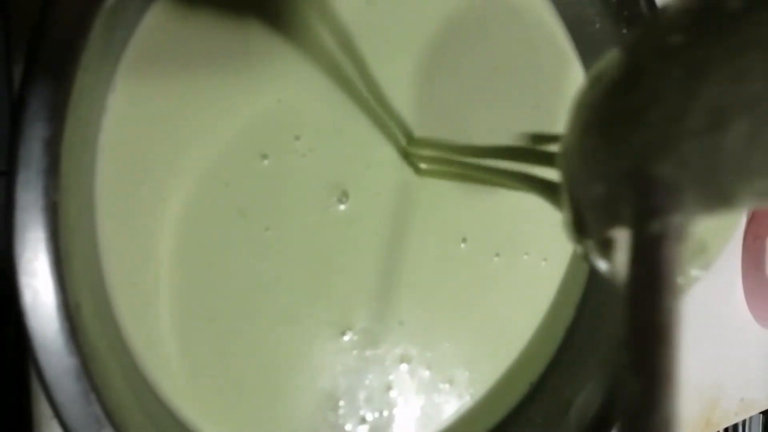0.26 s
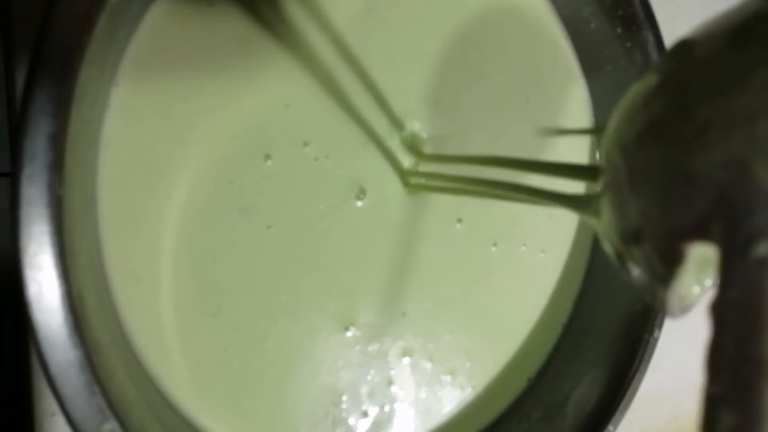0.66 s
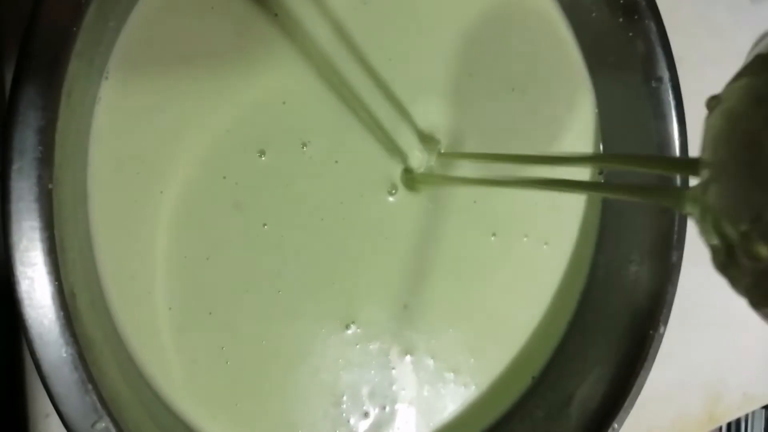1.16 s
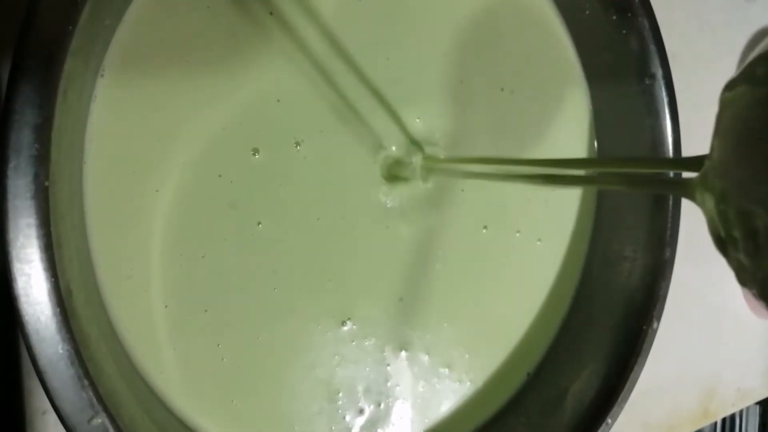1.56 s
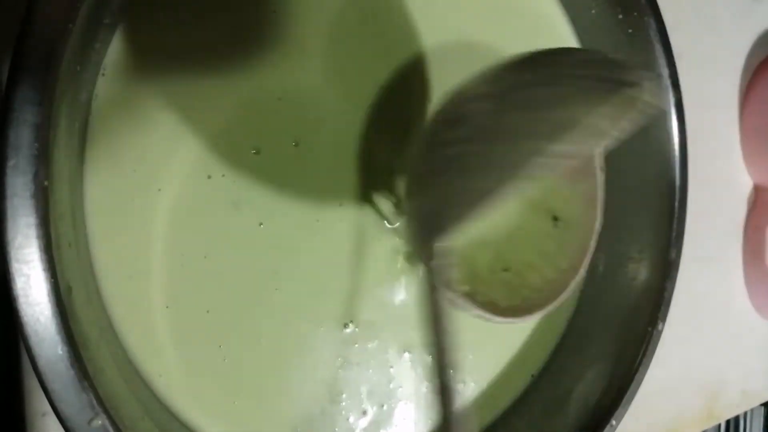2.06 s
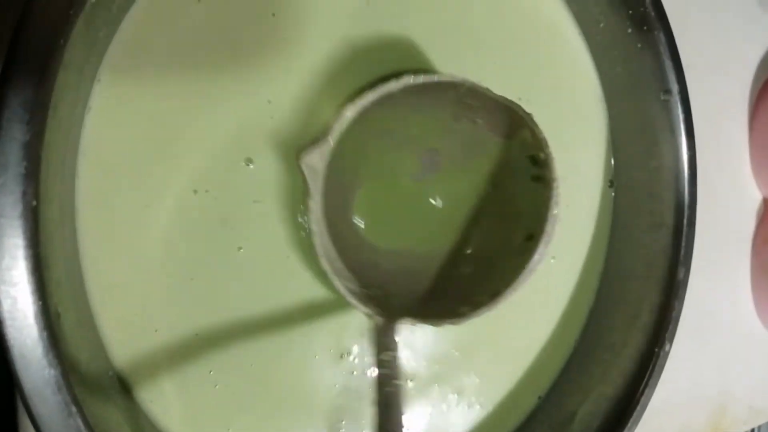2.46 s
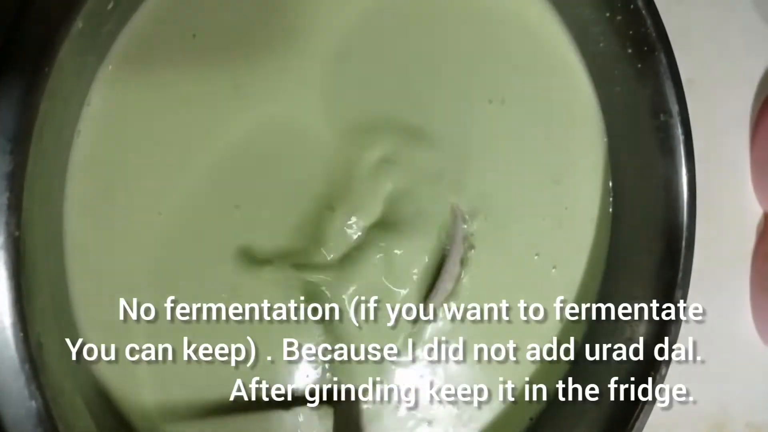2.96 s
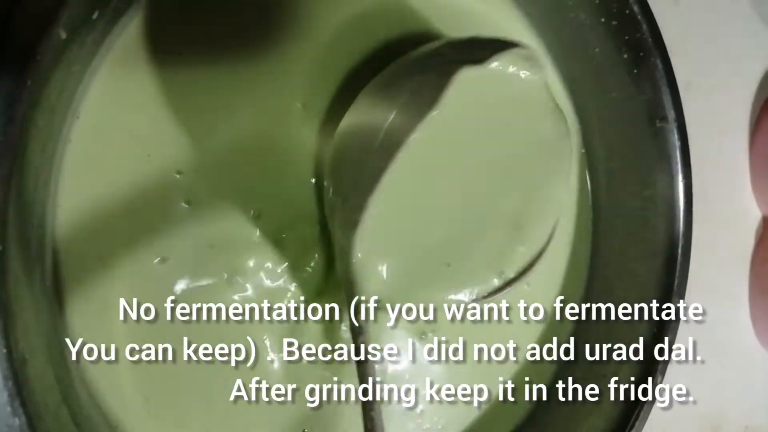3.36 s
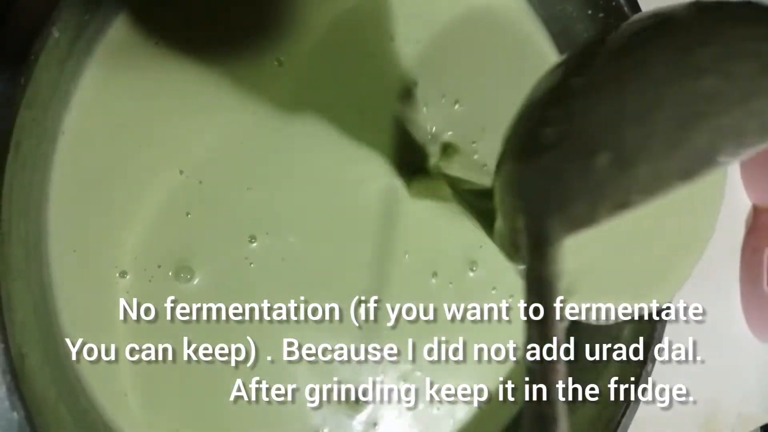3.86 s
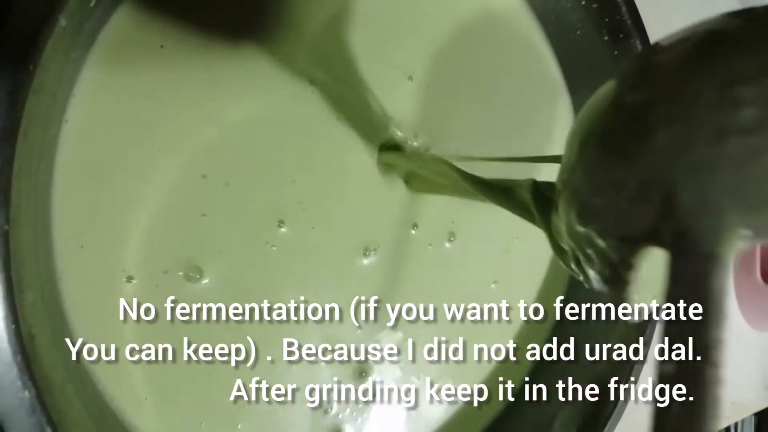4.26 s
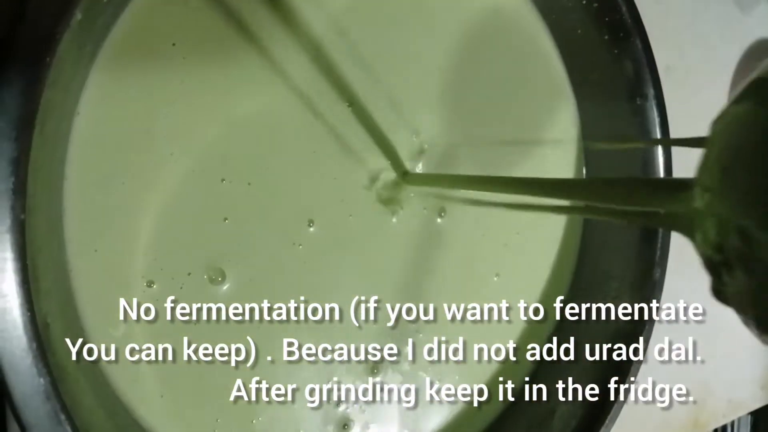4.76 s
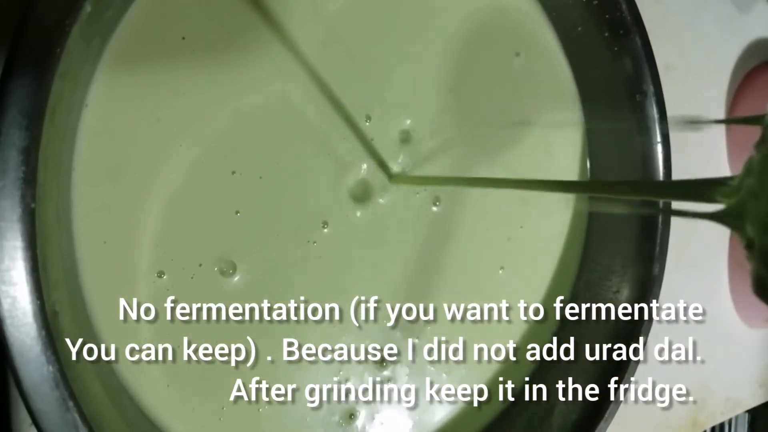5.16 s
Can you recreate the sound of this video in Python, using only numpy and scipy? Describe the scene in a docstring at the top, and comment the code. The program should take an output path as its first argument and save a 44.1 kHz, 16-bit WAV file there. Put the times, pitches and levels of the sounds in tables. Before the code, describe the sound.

Wet plopping and crackling drops of batter fall in two flurries, split by a quiet gap and soft low thuds, in a small kitchen.

```python
"""Batter dripping into a steel vessel

Thick batter drips and runs from a lifted ladle into a steel vessel in a small hard-walled kitchen.
Trapped air pockets plop and glide as decaying sines; small high bubbles snap; noise bursts spatter.
Random bubbles fizz, a shaking tone gurgles, low modes thud; appliance tones and room tone lie behind.
The left microphone port is covered: it hears dull bass, its own hiss and the touch of a hand."""
import sys
import numpy as np
from scipy import signal
from scipy.fft import rfft, irfft
from scipy.io import wavfile

SR = 44100
rng = np.random.default_rng(int(sys.argv[2]) if len(sys.argv) > 2 else 0)


def to_wav(s):
    """Save 16-bit WAV."""
    ch = np.atleast_2d(s).T  # columns
    pcm = np.round(np.clip(ch, -1, 1) * 32767)  # PCM
    wavfile.write(sys.argv[1], SR, pcm.astype(np.int16))


N = 238272


def amp(db):
    """Decibels to gain."""
    return 10 ** (np.asarray(db) / 20)


def rms_one(x):
    """Scales to unit rms."""
    return x / np.sqrt(np.mean(x ** 2) + 1e-20)


def in_time(rows, column=1, outside=None):
    """One column of a breakpoint curve, interpolated at every sample."""
    rows = np.array(rows)
    return np.interp(np.arange(N) / SR, rows[:, 0], rows[:, column], left=outside, right=outside)


def colour(x, spectrum):
    """Filters by (hz, db) points, interpolated over log frequency."""
    hz, db = np.transpose(spectrum)
    bin_hz = np.maximum(np.fft.rfftfreq(len(x), 1 / SR), 1)
    gain = amp(np.interp(np.log(bin_hz), np.log(hz), db))
    return irfft(rfft(x) * gain, len(x))


def drift(hz):
    """Two-pole low-passed noise of unit rms: slow chance."""
    r = np.exp(-2 * np.pi * hz / SR)
    noise = rng.standard_normal(N + SR)
    settled = signal.lfilter([1], [1, -2 * r, r * r], noise)[SR:]
    return rms_one(settled)


def add(out, start_s, sound):
    """Mixes a sound in from start_s."""
    i = round(start_s * SR)
    out[i:i + len(sound)] += sound[:N - i]


def bubble(hz, cycles, rise_oct):
    """Sine that swells fast, falls 15.5 dB per life (at least 2 cycles) and climbs rise_oct per life."""
    life_s = max(cycles, 2) / hz
    t = np.arange(int(2 * life_s * SR)) / SR
    envelope = (1 - np.exp(-t * hz / 3.1)) * amp(-60 * t / (3.87 * life_s))
    turns = np.cumsum(hz * 2 ** (rise_oct * t / life_s)) / SR
    return np.sin(2 * np.pi * turns) * envelope / envelope.max()


# air pockets shut in by the falling batter: start_s, level_db (relative), pitch_hz, life_cycles
PLOPS = [(0.1244, -53.5, 3300, 6.8), (0.3895, -30, 3080, 3.8), (0.5287, -46.5, 2630, 3.3),
         (0.529, -35, 1414, 12.6), (0.568, -41, 1360, 8.4), (0.5796, -40, 1890, 4.1),
         (0.655, -40.5, 1560, 3.5), (0.8062, -45, 2280, 11), (0.823, -40, 1586, 8.5),
         (0.839, -40, 2520, 8.8), (0.873, -48, 3270, 26), (0.928, -45, 1585, 7.1), (0.9343, -28, 2900, 2.7),
         (1.004, -38.5, 1480, 8.8), (1.006, -36.5, 2570, 1.6), (1.0365, -30.5, 1650, 2.1),
         (1.057, -44.5, 2580, 7.6), (1.1406, -26.5, 2463, 11.5), (1.1758, -29.5, 2565, 11),
         (1.263, -30.5, 905, 8.6), (1.2918, -32, 2870, 4.8), (1.323, -34.5, 1230, 2.6),
         (1.33, -26, 3300, 9.4), (1.346, -35.5, 1560, 5.3), (1.38, -37.5, 2630, 9.7),
         (1.404, -34, 910, 3.8), (1.4077, -36, 1740, 2.7), (1.484, -47, 1910, 9.9),
         (1.539, -38.5, 2980, 11), (1.55, -29.5, 2340, 3.5), (1.6887, -43.5, 2080, 5.4),
         (1.7398, -27.5, 4050, 7.1), (1.7799, -31.5, 2430, 3.4), (1.792, -35, 1535, 8.8),
         (1.855, -40, 928, 20), (1.882, -31.5, 848, 5.9), (1.92, -31.5, 3090, 7.2),
         (1.9652, -32, 2385, 5.2), (1.966, -40, 1545, 13), (2.758, -48, 3420, 18), (2.7666, -45, 3320, 26),
         (2.847, -34.5, 1030, 13.6), (2.8469, -41, 2320, 5.4), (2.8656, -25, 3350, 4.9),
         (3.48, -50, 2760, 12), (3.5749, -42, 2860, 9.7), (3.6074, -37, 2750, 2.1),
         (3.6735, -48, 2930, 7.8), (3.8332, -50.5, 3180, 7.7), (3.8486, -39, 1890, 4.4),
         (3.93, -41, 2340, 4), (4.0206, -48.5, 2270, 5.9), (4.1393, -49, 2460, 7.1),
         (4.1842, -49, 2410, 22), (4.225, -33.5, 2270, 2.6), (4.255, -44, 1137, 6.9),
         (4.2933, -26.5, 2100, 2.4), (4.3243, -42.5, 3090, 21), (4.3587, -27, 2700, 1.9),
         (4.427, -38, 1640, 5.7), (4.4302, -35.5, 1980, 5.5), (4.4762, -40.5, 2640, 12),
         (4.492, -35, 1504, 10), (4.516, -42, 1400, 14), (4.5173, -23, 2800, 3.8),
         (4.5945, -48.5, 1950, 11), (4.6476, -39, 2680, 10), (4.659, -35, 3180, 6.3),
         (4.728, -46, 1110, 1.7), (4.7267, -54, 2500, 10), (4.763, -35.5, 2380, 3.3),
         (4.812, -28, 1830, 5.6), (5.035, -41, 1553, 12.7), (5.0898, -55.5, 2080, 9),
         (5.1123, -45, 3230, 4.6), (5.353, -54.5, 880, 20)]
BEND_OCT = .04  # most rise per life


def plops():
    """A ringing air pocket each, bent up by chance, with the brief higher slap of the drop."""
    out = np.zeros(N)
    for start_s, level_db, pitch_hz, cycles in PLOPS:
        add(out, start_s, amp(level_db) * bubble(pitch_hz, cycles, BEND_OCT * rng.random()))
        slap = bubble(1.45 * pitch_hz, cycles=2.2, rise_oct=.03)
        add(out, start_s, amp(level_db - 6.0) * slap)
    return out


# pockets that open as they reach the surface:
# start_s, level_db (relative), start_hz, life_cycles, rise_oct (per life)
GLIDES = [(1.321, -33.5, 2200, 20.7, 0.88), (1.542, -39.5, 1592, 18, 0.66), (1.712, -39.5, 1780, 31, 1)]


def glides():
    """One bubble of rising pitch each."""
    out = np.zeros(N)
    for start_s, level_db, start_hz, cycles, rise_oct in GLIDES:
        add(out, start_s, amp(level_db) * bubble(start_hz, cycles, rise_oct))
    return out


# tiny bubbles bursting at the surface: start_s, level_db (relative), pitch_hz
SNAPS = [(0.386, -35, 5500), (0.4114, -36.5, 4990), (0.5662, -51, 5340), (0.6958, -31, 5200),
         (0.884, -49, 5370), (0.902, -27, 4870), (0.927, -34.5, 5760), (1.0346, -40, 5400),
         (1.3384, -28, 6300), (1.3657, -25.5, 5550), (1.4094, -28.5, 6340), (1.524, -20, 5880),
         (1.5838, -22.5, 6740), (1.6978, -40.5, 5500), (1.7285, -28, 5140), (1.8804, -33.5, 5500),
         (1.9158, -33, 5520), (2.2425, -51.5, 5840), (2.3102, -49, 5180), (2.8664, -32.5, 5340),
         (3.4798, -45, 5600), (3.6079, -32, 6050), (3.835, -41.5, 6900), (3.848, -24, 5380),
         (3.9535, -41, 5440), (4.0208, -44.5, 5640), (4.0868, -47, 5800), (4.2919, -41, 5700),
         (4.3235, -37.5, 5600), (4.338, -33, 5160), (4.4273, -39, 5240), (4.492, -38.5, 5540),
         (4.5047, -24, 5440), (4.5965, -32.5, 4850), (4.664, -32, 5860), (4.81, -38, 5550),
         (4.8489, -20.5, 5500), (4.9575, -40, 5600), (5.3903, -46.5, 5470)]
# film burst by every drop: level relative to its plop, centre pitch, rms spread
FILM_DB, FILM_HZ, FILM_SPREAD_OCT = -11, 5550, .04


def snaps():
    """A small high bubble each, plus a film bubble fainter than the plop it comes with."""
    films = []
    for start_s, plop_db, *_ in PLOPS:
        film_hz = FILM_HZ * 2 ** (FILM_SPREAD_OCT * rng.standard_normal())
        films.append((start_s, plop_db + FILM_DB, film_hz))
    out = np.zeros(N)
    for start_s, level_db, pitch_hz in SNAPS + films:
        add(out, start_s, amp(level_db) * bubble(pitch_hz, cycles=4.4, rise_oct=0.0041))
    return out


# flecks thrown off where the stream breaks: start_s, level_db (relative), t60_s
SPLASHES = [(0.386, -39.5, 0.016), (0.6363, -58, 0.032), (0.927, -50.5, 0.028), (1.139, -54, 0.021),
            (1.1762, -34.5, 0.024), (1.2151, -39, 0.02), (1.381, -40, 0.026), (1.4162, -40, 0.024),
            (1.4378, -41.5, 0.14), (1.5233, -63, 0.015), (1.563, -42.5, 0.026), (1.717, -48, 0.078),
            (1.855, -49, 0.066), (1.8996, -51.5, 0.073), (1.9662, -48, 0.03), (2.7457, -57.5, 0.04),
            (2.849, -44.5, 0.046), (2.8642, -27.5, 0.021), (2.874, -44, 0.071), (3.558, -62.5, 0.042),
            (3.6071, -48, 0.017), (3.8476, -50.5, 0.028), (4.2926, -44.5, 0.034), (4.3243, -42, 0.028),
            (4.357, -47, 0.03), (4.4271, -53, 0.03), (4.504, -52, 0.055), (4.845, -48, 0.022),
            (5.3542, -39, 0.022)]
# colour of the flecks: freq_hz, gain_db
SPATTER = [(700, -14.5), (1500, -6), (3000, -15), (5500, -5), (8000, -11.5), (11000, -12), (15000, -12),
           (16200, -28)]


def splashes():
    """Short decaying bursts of broad noise, made gritty by fast level drift."""
    gate, t = np.zeros(N), np.arange(SR // 8) / SR
    for start_s, level_db, t60_s in SPLASHES:
        decay = amp(level_db - 60 * t / max(t60_s, .004))
        add(gate, start_s, decay * (1 - np.exp(-t / 0.00095)))
    grit = rng.standard_normal(N) * amp(6.0 * drift(1000.0))
    return gate * rms_one(colour(grit, SPATTER))


# the broken stream fizzing, one curve per stretch: time_s, level_db (relative)
FIZZ = [
    [(0.8, -83), (0.994, -79), (1.274, -58.5), (1.418, -65), (1.544, -71), (1.834, -58.5), (1.87, -52),
     (1.99, -72), (2.1, -103)],
    [(4.15, -93), (4.248, -63), (4.386, -65.5), (4.452, -88), (4.584, -70), (4.724, -79), (4.95, -82)],
]
DRIPS_DB = -3.5  # stray droplets against the fizz


def fizz(per_s, cycles, top_hz):
    """Faint bubbles at random moments, of random strength and one of 16 pitches."""
    level = sum(amp(in_time(curve, outside=-120)) for curve in FIZZ)
    strength = amp(3.0 * np.minimum(rng.exponential(1, N), 3))
    clicks = (rng.random(N) < per_s / SR) * strength
    pitch_index = rng.integers(0, 16, N)
    out = np.zeros(N)
    for k, hz in enumerate(np.geomspace(1100, top_hz, 16)):
        out += signal.oaconvolve(clicks * (pitch_index == k), bubble(hz, cycles, rise_oct=0.17))[:N]
    return level * rms_one(out) * amp(3.0 * drift(25.0))


# stream drumming on a hollow it keeps open in the batter, one curve per stretch:
# time_s, level_db (relative), pitch_hz (before shake)
GURGLE = [
    [(1.25, -62, 911), (1.306, -67, 887), (1.342, -52, 1000), (1.5, -65, 818)],
    [(1.64, -47.5, 723), (1.684, -68, 750), (1.734, -60, 891), (1.842, -51, 848), (2.0, -53, 925),
     (2.04, -93, 910)],
    [(4.72, -57, 1138), (4.91, -73.5, 1116), (5.12, -72, 1175)],
]


def gurgle():
    """A rough sine whose level and pitch shake by chance."""
    shake = 2 ** (.045 * drift(60.0))
    swell = amp(4.5 * drift(40.0))
    out = np.zeros(N)
    for curve in GURGLE:
        turns = np.cumsum(in_time(curve, column=2) * shake) / SR
        out += amp(in_time(curve, outside=-120)) * swell * np.sin(2 * np.pi * turns)
    return out


# exponential noise tails; energy gain relative to the direct sound
VESSEL_T60_S, VESSEL_DB, KITCHEN_T60_S, KITCHEN_DB = 0.068, 0, 0.33, -7.5


def reverberate(x):
    """Dense quick echoes in the steel vessel plus the longer tail of the kitchen."""
    t = np.arange(SR // 2) / SR
    tails = [(VESSEL_T60_S, VESSEL_DB, .002), (KITCHEN_T60_S, KITCHEN_DB, .008)]
    echoes = np.zeros(len(t))
    for t60_s, gain_db, onset_s in tails:
        tail = rng.standard_normal(len(t)) * amp(-60 * t / t60_s)
        tail *= 1 - np.exp(-(t / onset_s) ** 2)
        echoes += amp(gain_db) * tail / np.sqrt(np.sum(tail ** 2))
    return x + signal.oaconvolve(x, echoes)[:N]


# ladle settling on the vessel bottom, pushes: start_s, push_db (added to each mode)
THUDS = [(2.889, -6.5), (2.927, -0.5)]
# modes of vessel and counter: mode_hz, level_db (relative), t60_s
THUD = [(78, -32.5, 0.11), (52.2, -42, 0.2), (139, -53, 0.16)]


def thud():
    """Low decaying modes of vessel and counter, pushed softly."""
    out, t = np.zeros(N), np.arange(SR // 2) / SR
    for start_s, push_db in THUDS:
        for mode_hz, level_db, t60_s in THUD:
            envelope = amp(push_db + level_db - 60 * t / t60_s) * (1 - np.exp(-t / 0.012))
            add(out, start_s, envelope * np.sin(2 * np.pi * mode_hz * t))
    return out


# steady appliance tones: tone_hz, rms_db (relative)
HUM = [(99.9, -67.5), (199.7, -74.5), (242.2, -77.5), (299.8, -73), (399.8, -80), (629.3, -82.5),
       (726.7, -86), (775.2, -75.5), (969, -85.5)]
# wavering low drone: time_s, rms_db (relative)
RUMBLE = [(0.0, -65), (0.07, -66.5), (0.96, -73), (1.16, -95), (2.3, -59.5), (2.75, -71), (2.93, -58),
          (3.01, -72), (3.1, -84), (3.62, -70), (3.7, -75), (4.14, -63), (4.33, -77), (4.6, -65.5),
          (4.81, -76), (5.4, -76)]
RUMBLE_HZ, RUMBLE_DRIFT_HZ = 48.4, 0.83
# room tone shape: freq_hz, density_db (relative, per Hz)
AIR = [(12, -2.5), (20, -5.5), (101, -10.5), (150, -15.5), (193, -8), (293, -8.5), (558, -18), (780, -20),
       (849, -23.5), (3070, -30), (3840, -36.5), (5380, -28.5), (7950, -43), (14700, -37.5), (16000, -41)]
AIR_RMS_DB = -66.0  # relative


def appliances():
    """Sines wavering in level and phase, a phase-drifting low drone and coloured-noise room tone."""
    t = np.arange(N) / SR
    tones = np.zeros(N)
    for tone_hz, rms_db in HUM:
        level = np.sqrt(2) * amp(rms_db + 1.45 * drift(1.5))
        turns = tone_hz * t + rng.random()
        tones += level * np.sin(2 * np.pi * turns + 0.77 * drift(0.89))
    drone = np.sin(2 * np.pi * RUMBLE_HZ * t + 1.2 * drift(RUMBLE_DRIFT_HZ))
    drone *= np.sqrt(2) * amp(in_time(RUMBLE))
    air = amp(AIR_RMS_DB) * rms_one(colour(rng.standard_normal(N), AIR))
    return tones + drone + air


# microphone port, dips and tube resonance: centre_hz, width_hz, gain_db (at share 1)
PORT = [(4240, 1030, -7), (5500, 496, 9), (7900, 500, -7.5)]


def open_port(x, share=1):
    """Chain of peaking filters; share scales their dB."""
    for centre_hz, width_hz, gain_db in PORT:
        a = amp(share * gain_db / 2)
        q = np.pi * width_hz / SR
        c = -2 * np.cos(2 * np.pi * centre_hz / SR)
        x = signal.lfilter([1 + q * a, c, 1 - q * a], [1 + q / a, c, 1 - q / a], x)
    return x


# what the cover lets through: freq_hz, gain_db
COVER = [(30, -16.5), (100, -18), (300, -29), (900, -32.5), (1500, -48), (16000, -61)]
COVER_LAG_S = .0011
# self-noise shape before the port: freq_hz, gain_db
HISS = [(20, 0), (70, -7), (300, -16), (1000, -20.5), (3000, -25), (7000, -31.5), (15000, -32),
        (15600, -61.5)]
HISS_RMS_DB = -75
# the hand on the covered port: start_s, level_db (of the t*exp envelope), rate_per_s
TOUCHES = [(2.309, -47, 300), (2.65, -59, 250), (4.013, -47, 151), (5.338, -47, 170)]


def covered_port(sound):
    """Late and muffled sound, self-noise, and soft bumps of the hand."""
    out = np.roll(colour(sound, COVER), round(COVER_LAG_S * SR))
    hiss = open_port(colour(rng.standard_normal(N), HISS), share=0.61)
    out += amp(HISS_RMS_DB) * rms_one(hiss)
    t = np.arange(SR // 10) / SR
    for start_s, level_db, rate_per_s in TOUCHES:
        x = rate_per_s * t
        add(out, start_s, amp(level_db) * np.e * x * np.exp(-x) * (1 - x / 3))
    return out


# gain of all sound reaching both ports; further gain of the batter
SOUND_DB, BATTER_DB = 6.0, -5


def scene():
    """Left port covered, right port open."""
    stream = fizz(per_s=1100.0, cycles=3.9, top_hz=7100)
    droplets = amp(DRIPS_DB) * fizz(per_s=93.0, cycles=11.0, top_hz=3700)
    dry_batter = plops() + glides() + snaps() + splashes() + stream + droplets + gurgle()
    batter = amp(BATTER_DB) * open_port(reverberate(dry_batter))
    sound = amp(SOUND_DB) * (batter + thud() + appliances())
    return np.array([covered_port(sound), sound])


CUTOFF_HZ = 16500  # stopband edge, 50 dB down


def record(dry):
    """Steep low-pass cuts the top."""
    return signal.sosfilt(signal.cheby2(20, 50, CUTOFF_HZ, fs=SR, output="sos"), dry)


dry = scene()
out = record(dry)
to_wav(out)
```